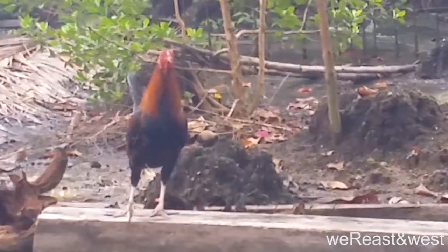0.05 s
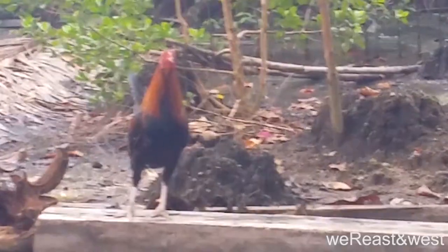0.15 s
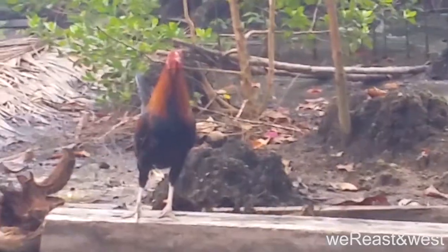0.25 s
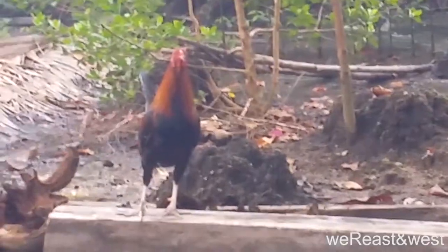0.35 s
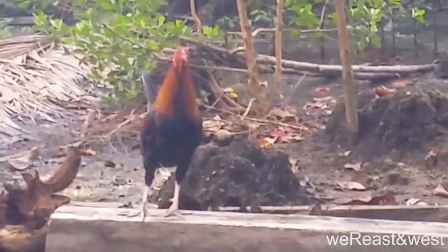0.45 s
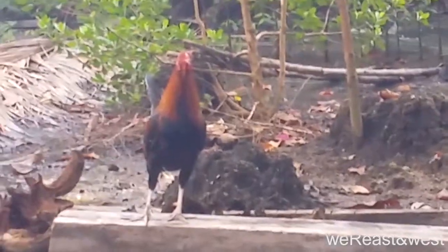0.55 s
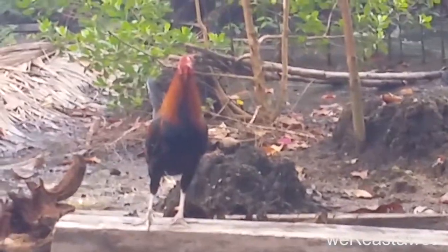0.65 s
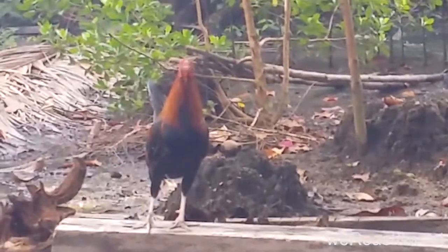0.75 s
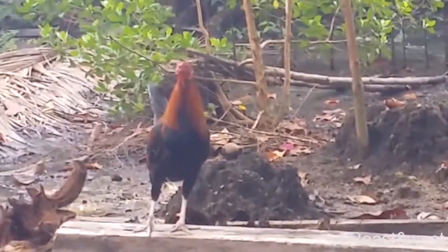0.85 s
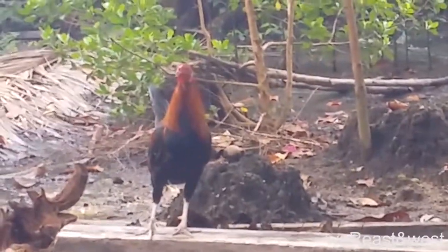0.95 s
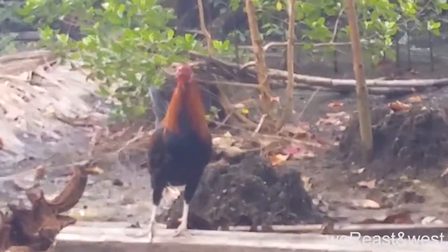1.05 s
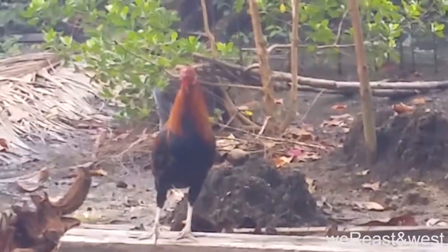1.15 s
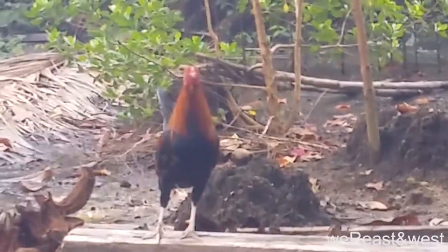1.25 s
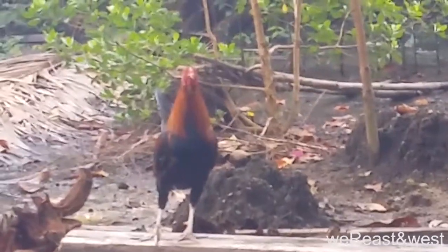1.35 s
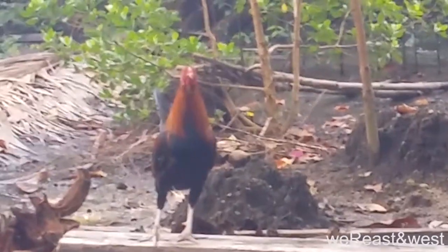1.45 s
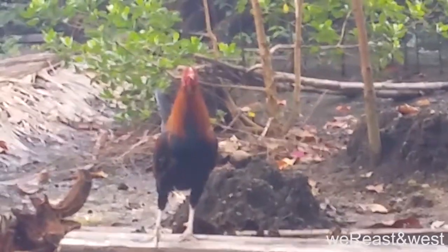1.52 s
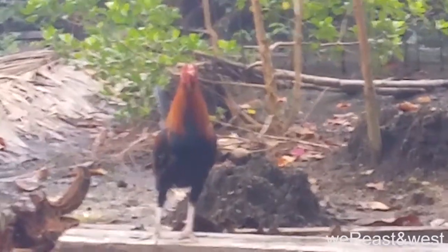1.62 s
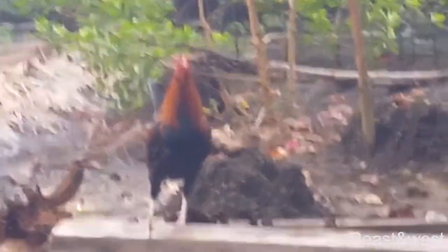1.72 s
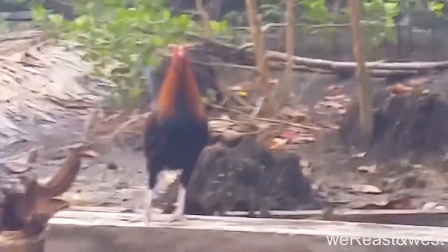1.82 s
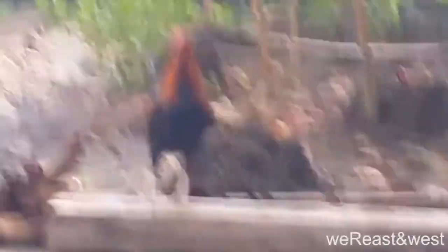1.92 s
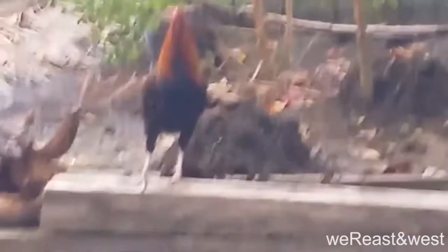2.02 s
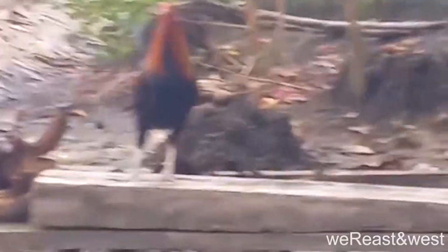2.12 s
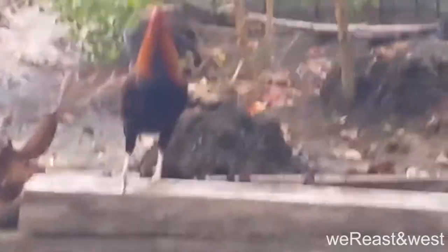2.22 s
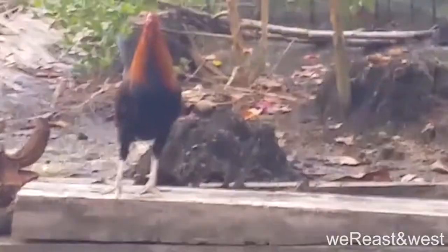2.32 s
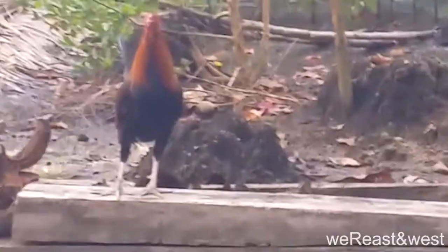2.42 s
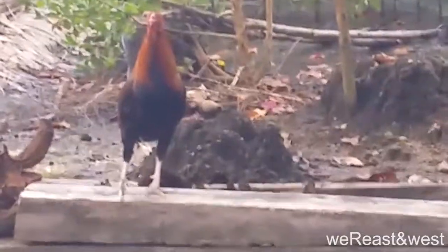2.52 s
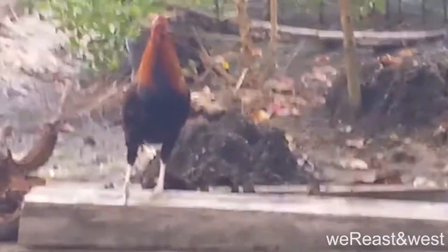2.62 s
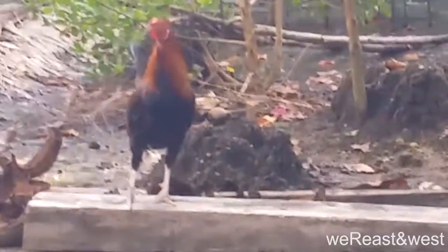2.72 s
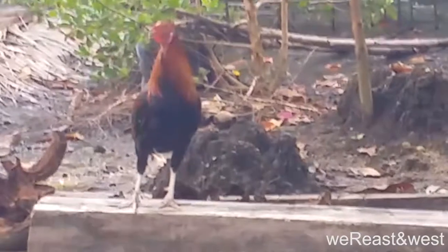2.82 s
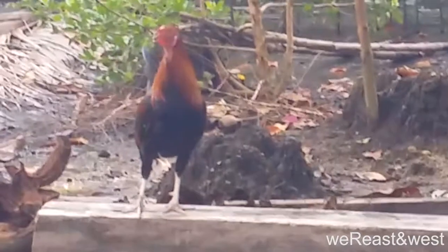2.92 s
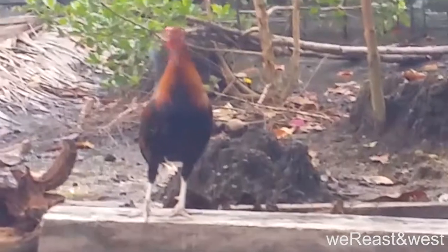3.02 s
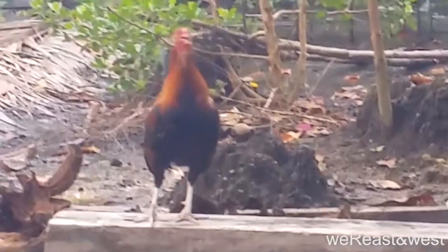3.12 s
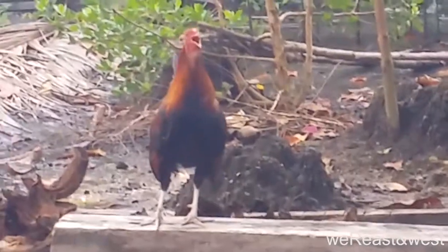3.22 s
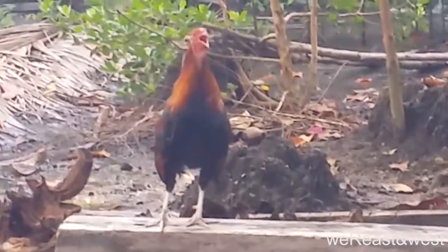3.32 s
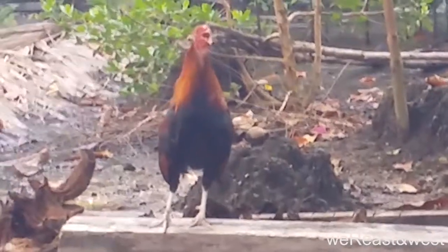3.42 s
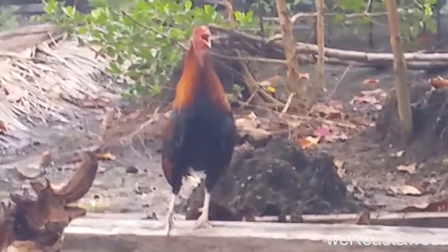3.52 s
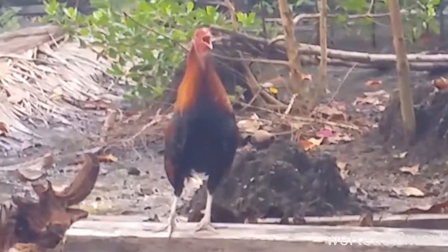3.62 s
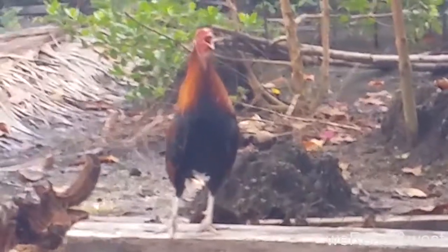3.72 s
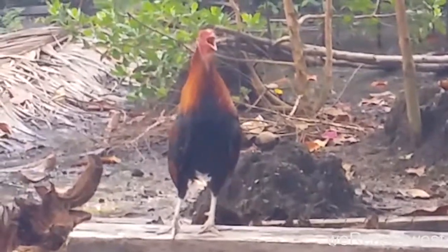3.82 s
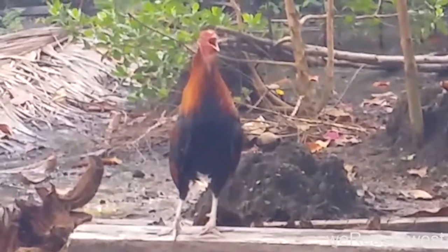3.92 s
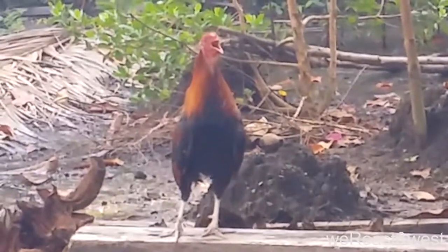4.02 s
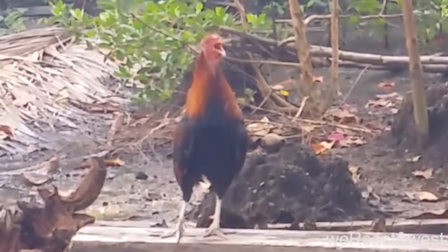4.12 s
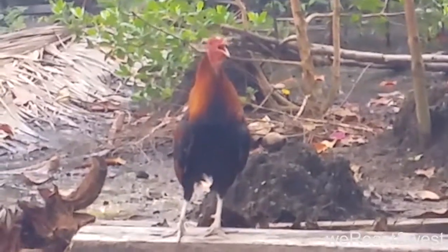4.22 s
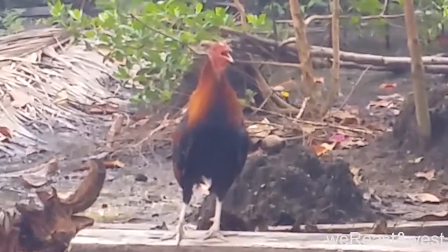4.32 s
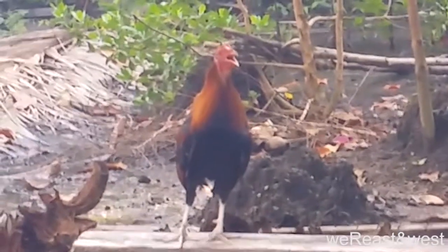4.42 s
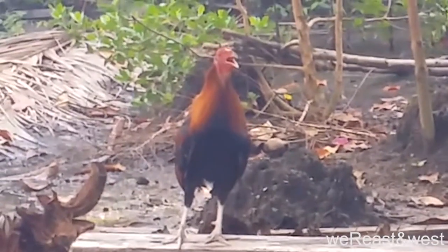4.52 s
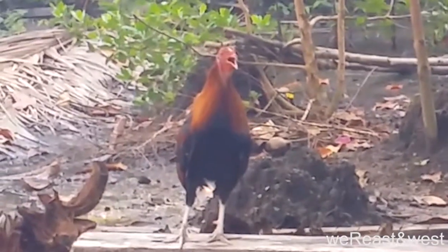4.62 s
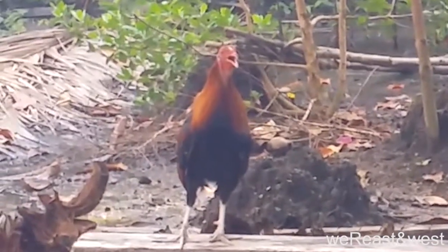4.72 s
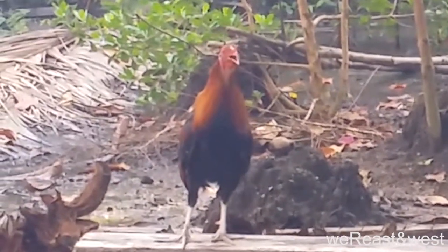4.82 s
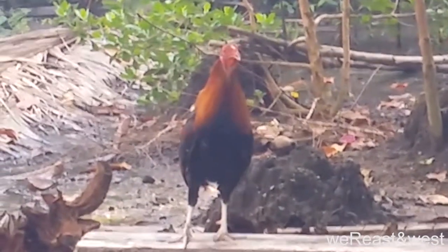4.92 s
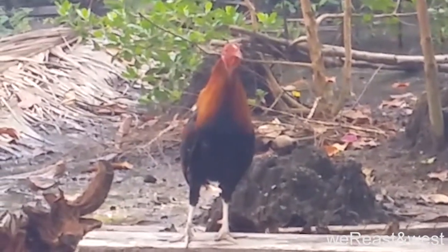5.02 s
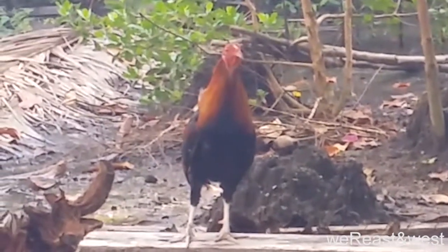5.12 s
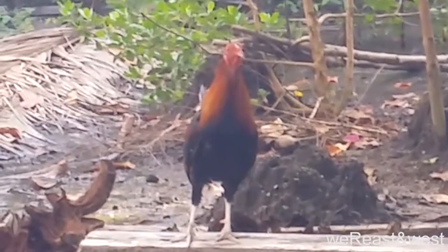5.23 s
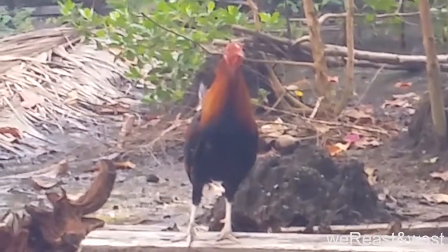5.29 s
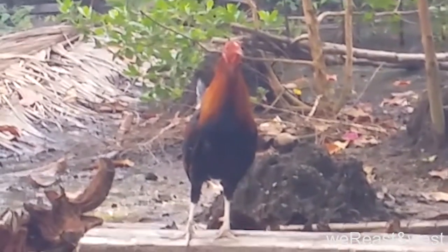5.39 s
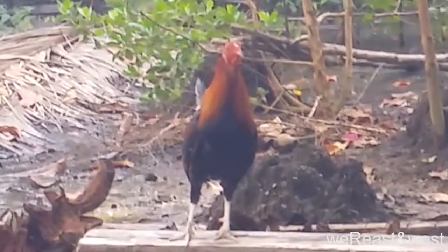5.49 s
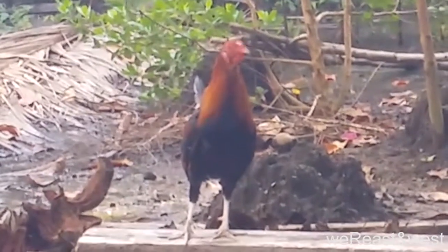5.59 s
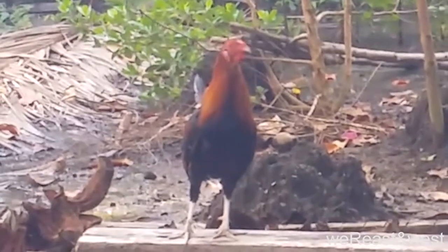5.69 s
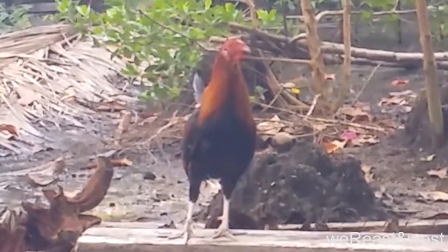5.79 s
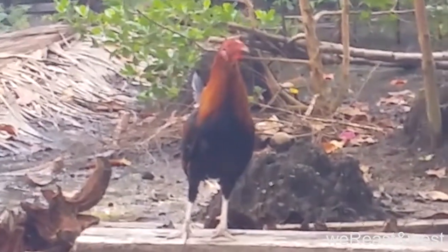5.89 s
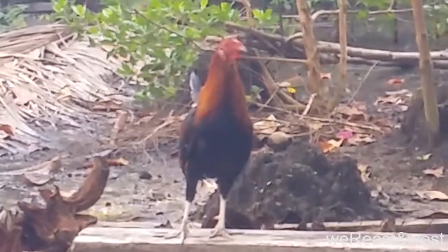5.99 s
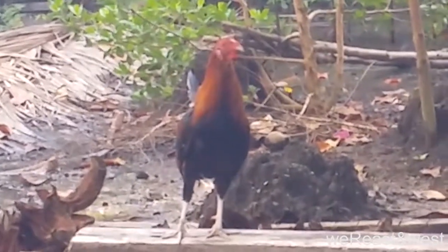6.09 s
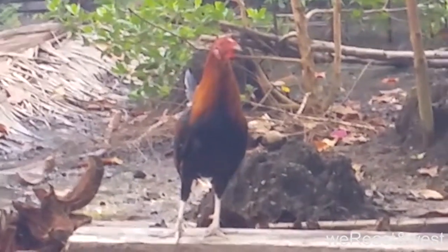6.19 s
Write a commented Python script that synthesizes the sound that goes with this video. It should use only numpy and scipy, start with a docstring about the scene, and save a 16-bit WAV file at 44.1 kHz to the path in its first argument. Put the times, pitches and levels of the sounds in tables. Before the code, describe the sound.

Outdoors in a yard, a distant one-cylinder engine putters over dull traffic rumble and soft hiss. The tail of a far rooster's crow fades at the very start, and small birds chirp thinly. The engine swells, then a rooster close to the microphone crows once: five loud, hoarse notes that overload and briefly push the engine down. Afterwards the engine and rumble continue.

```python
"""A rooster crows once, close by: five notes of drifting overtones that break into rasp and clip at full scale.
A one-cylinder engine putters past in the distance, each firing ringing its exhaust; gain control ducks it
under each note. Behind it, filtered noise gives traffic rumble and an airy hiss. Small birds chirp as gliding
sines in the trees, and at first a second rooster, one gliding overtone, ends its crow far away."""
import sys
import numpy as np
from scipy import signal
from scipy.fft import rfft, irfft, next_fast_len
from scipy.io import wavfile

SR = 44100
rng = np.random.default_rng(int(sys.argv[2]) if len(sys.argv) > 2 else 0)


def generate_wav(signal):
    """Clip the signal to [-1, 1] and save it as 16-bit WAV at the path in sys.argv[1]."""
    frames = np.transpose(np.atleast_2d(signal))
    scaled = np.clip(frames, -1, 1) * 32767
    pcm = np.round(scaled).astype(np.int16)
    wavfile.write(sys.argv[1], SR, pcm)


N = 275669
TIME = np.arange(N) / SR

# hiss spectrum: (frequency [Hz], relative level [dB])
AIR_SPECTRUM = [(300, -23.5), (500, -7), (640, -11.5), (820, -3), (1000, -8.5), (1250, -11), (1700, -11),
                (2480, -10), (3200, -16.5), (4000, -17.5), (8500, -20.5), (10500, -31), (14600, -34),
                (15500, -41)]
# hiss level before the common background step: (time [s], level [dB])
AIR_LEVEL_DB = [(0, -46), (3.1, -41), (5.3, -38), (6.25, -39)]
# traffic rumble spectrum: (frequency [Hz], relative level [dB])
RUMBLE_SPECTRUM = [(20, -48), (45, -27), (65, -6.5), (88, -4.5), (120, 1.5), (200, -6), (300, -12.5),
                   (500, -21), (900, -43), (2000, -83)]
# rumble level before the common background step: (time [s], level [dB])
RUMBLE_LEVEL_DB = [(0, -30.5), (2.4, -32), (3, -29.5), (3.5, -31.5), (4.5, -27), (5, -30.5), (5.5, -25.5),
                   (6.25, -27.5)]
# left-right likeness of wide noise: (frequency [Hz], correlation [-1..1])
LIKENESS = [(60, 1), (150, 0.89), (380, 0.72), (950, 0.093), (2380, 0.0048), (5980, -0.13), (15000, 0.25)]
# decay of the yard's scatter: (frequency [Hz], t60 [s])
YARD_T60_S = [(200, 0.87), (900, 0.37), (2000, 0.68), (7000, 0.7), (14000, 0.033)]

# small birds' glides: (start [s], length [s], start pitch [Hz], end pitch [Hz], relative level [dB])
CHIRPS = [(0.23, 0.056, 5030, 6740, -53.5), (0.471, .04, 5300, 4600, -53), (0.546, 0.042, 3260, 2970, -49),
          (0.853, 0.088, 4000, 5220, -59), (0.934, 0.046, 5330, 7000, -52.5),
          (1.452, 0.028, 4130, 3200, -49), (2.352, .06, 3730, 5380, -42), (2.405, 0.049, 4900, 7200, -36.5),
          (2.439, 0.052, 7200, 6700, -46), (2.73, 0.031, 4430, 3200, -44), (5.221, 0.029, 4580, 3820, -42)]
# far rooster's strongest overtone: (time [s], frequency [Hz], relative level [dB])
FAR_CROW = [(-.02, 2058, -29), (0.051, 1997, -64), (.15, 1965, -64), (.25, 1945, -50.5), (.35, 1897, -43),
            (.43, 1870, -66), (.5, 1800, -46)]

# engine speed: (time [s], firing rate [1/s])
FIRING_RATE_HZ = [(0, 33.7), (1.3, 34.1), (3.15, 34.45), (3.7, 32.7), (4.5, 32), (5.95, 32.35), (6.25, 30)]
# engine level before the front/rear trims and the background step: (time [s], level [dB])
ENGINE_LEVEL_DB = [(0, -30.5), (1.7, -22), (2.05, -23), (2.3, -17.5), (3.4, -17.5), (4.55, -25), (5.1, -23),
                   (5.5, -22.5), (6.25, -25)]
# exhaust spectrum before and after it passes: (frequency [Hz], relative level [dB])
EXHAUST_COMING = [(30, -62.5), (68, -39.5), (103, -14.5), (137, 1), (171, -3.5), (206, 0), (240, -20),
                  (275, -16.5), (308, -15.5), (345, -22), (410, -23.5), (480, -30.5), (600, -32.5),
                  (1500, -67)]
EXHAUST_GOING = [(30, -38), (64, -46.5), (97, -1.5), (129, 3), (161, 4), (192, -7), (225, -7.5),
                 (260, -17.5), (290, -13.5), (355, -22), (450, -22), (700, -57), (1500, -92.5)]

# crow notes: (start [s], end [s], release [s], level [dB], level slope [dB/s], opening accent [dB],
#              roughness [0-1], period doubling [0-1], slope of the 1.5x line [dB/s], rasp re level [dB])
NOTES = [(3.188, 3.333, 0.043, 8.5, -14, -1, 0.05, 0.41, 0, -22.5),
         (3.465, 3.785, 0.01, 0.5, -3.5, 0, .08, 0, 0, -22.5),
         (3.765, 4.097, 0.021, 0, 2.5, 6.5, 0.32, 0.81, 2, -12),
         (4.228, 4.549, .008, -2, -23, 9.5, 0.1, 0.97, 33, -24),
         (4.545, 4.753, 0.031, -6.5, 15, 0, .22, 0.96, -25, -12)]
# overtones of each note in turn: (multiple of the pitch [-], relative level [dB])
OPENING_OVERTONES = [(1, -19), (1.5, -48), (2, 6), (2.5, -7.5), (3, -70), (3.5, -31), (4, -35), (4.5, -50),
                     (5, -31), (5.5, -50), (6, -41), (6.5, -42), (7, -35), (7.5, -16), (8, -22), (8.5, -38),
                     (9, -31)]
RISING_OVERTONES = [(1, -10), (2, 7.5), (3, -18.5), (4, -12.5), (5, -22), (6, -20.5), (7, -25.5), (8, -24),
                    (9, -28), (10, -19.5), (11, -44), (12, -30.5), (13, -34), (14, -50), (15, -36)]
STRAINED_OVERTONES = [(1, -19), (1.5, -40), (2, 4.5), (2.5, -10), (3, -32), (3.5, -15.5), (4, -26.5),
                      (4.5, -30), (5, -31.5), (5.5, -28), (6, -28), (6.5, -45), (7, -46), (7.5, -48),
                      (8, -28.5), (8.5, -45), (9, -38)]
HELD_OVERTONES = [(1, -27.5), (1.5, -9.5), (2, 2), (2.5, -10.5), (3, -28), (3.5, -32), (4, -32.5),
                  (4.5, -29), (5, -30.5), (5.5, -38), (6, -43), (6.5, -27), (7, -28), (7.5, -20), (8, -31),
                  (8.5, -29), (9, -35)]
FALLING_OVERTONES = [(1, -12.5), (1.5, -6.5), (2, 5), (2.5, -10.5), (3, -45), (3.5, -36), (4, -52.5),
                     (4.5, -43), (5, -28), (5.5, -30), (6, -58), (6.5, -35), (7, -29), (7.5, -20.5),
                     (8, -14.5), (8.5, -27), (9, -20), (9.5, -44), (10, -25)]
# second harmonic, an octave above the pitch, one list for each of the first four notes: (time [s], frequency [Hz])
SECOND_HARMONIC_HZ = [
    [(3.197, 1865), (3.237, 1869), (3.305, 1828), (3.32, 1757)],
    [(3.472, 1943), (3.476, 1960), (3.492, 2129), (3.534, 2124), (3.58, 1916), (3.618, 1909), (3.76, 1949)],
    [(3.775, 2036), (3.793, 1954), (3.801, 2047), (3.941, 2078), (4.021, 2031), (4.035, 1936),
     (4.075, 1914)],
    [(4.232, 1856), (4.274, 2025), (4.338, 1944), (4.35, 2009), (4.42, 2009), (4.488, 1971), (4.545, 1985)],
]
# second harmonic of the last note, sinking as the voice gives out: (time [s], frequency [Hz])
LAST_SECOND_HARMONIC_HZ = [(4.56, 1809), (4.714, 1746), (4.735, 1697)]
# breaks into rasp, mostly at note edges: (time [s], rise [s], fall [s], rasp [dB], pitch drop [Hz])
BREAKS = [(3.176, .009, .011, -13.5, 200), (3.316, 0.015, 0.041, -6, 14), (3.351, 0.016, 0.054, -15.5, -15),
          (3.462, 0.011, 0.0081, -12.5, 109), (3.625, 0.022, 0.032, -13.5, -1),
          (3.762, .012, 0.013, -22, -0.5), (4.089, 0.011, 0.028, -5, 19.5), (4.17, 0.05, 0.0585, -14, 10.5),
          (4.221, 0.01603, 0.01083, -8, 111), (4.75, 0.011, 0.017, -12.5, 69)]
# throat resonances colouring the rasp: (frequency [Hz], width before narrowing [Hz], level [dB])
THROAT = [(817, 300, 3), (1303, 330, 2), (1912, 380, 4), (2458, 480, 3), (3490, 650, -6.5),
          (7100, 3200, -20), (11400, 8600, -24)]
# stereo lean of the beak's sound: (frequency [Hz], left minus right [dB])
BEAM_DB = [(900, 2), (1400, 2.5), (1950, 7), (2500, -6.5), (3500, -6), (5000, 7.5), (7000, 15.5),
           (8300, -4.5), (12000, 4)]

# engine, rumble and hiss step up together, later down again
STEP_UP_S, STEP_DOWN_S, STEP_DB = 1.73, 5.55, 5.5
# the engine passes; its sound turns from front to rear over TURN_S
PASS_S, TURN_S = 3.26, 0.1
# approaching engine: upper overtones gain BRIGHTEN dB per dB of level above PLAIN_DB
BRIGHTEN_DB_PER_DB, BRIGHTEN_FROM_HZ, PLAIN_DB = 0.44, 277, -24.5
# a note swells, overshoots briefly and settles
ATTACK_S, ACCENT_AT_S, ACCENT_S = 0.0084, 0.021, 0.019
# the folds need a moment before their cycles start to alternate
DOUBLING_FROM_S, DOUBLING_RISE_S = 0.032, 0.018
BREAK_ROUGHNESS = 0.3
# the throat's lowest resonance lifts a fundamental that slides through it
LOW_RING_HZ, LOW_WIDTH_HZ, LOW_RING_DB = 790, 45.5, -7.5
# the higher the pitch, the more the second harmonic leans right
CENTRE_HZ, SWING_DB_PER_HZ = 868, -0.0688
EDGE_HZ = 15700


def amp(db):
    """Decibels to gain."""
    return 10 ** (np.asarray(db) / 20)


def evened(x):
    """Scales to rms 1."""
    return x / np.sqrt(np.mean(x ** 2) + 1e-20)


def read(points, hz):
    """Reads a spectrum on a log-frequency axis."""
    f, value = np.transpose(points)
    return np.interp(np.log(hz + 1), np.log(f + 1), value)


def curves(rows):
    """Each column of a table at every sample; the first column is time."""
    s, *columns = np.transpose(rows)
    return [np.interp(TIME, s, column) for column in columns]


def gate(start_s, end_s, fade_s):
    """One between two times, with linear fades inside."""
    return np.clip(np.minimum(TIME - start_s, end_s - TIME) / fade_s, 0, 1)


def shaped(x, gain):
    """Filters by a gain given as a function of frequency."""
    size = next_fast_len(N + 4096)
    spectrum = rfft(x, size) * gain(np.fft.rfftfreq(size, 1 / SR))
    return irfft(spectrum, size)[..., :N]


def wander(hz):
    """Random drift of rms 1, mostly slower than hz."""
    return evened(shaped(rng.standard_normal(N), lambda f: 1 / (1 + (f / hz) ** 4)))


def glide(hz):
    """Sine of varying frequency."""
    return np.sin(2 * np.pi * np.cumsum(hz) / SR)


def ports(x, lead_ms):
    """Time difference between the sides; the left leads if positive."""
    sides = np.array([[1], [-1]])
    return shaped(x, lambda f: np.exp(1j * np.pi * f * lead_ms / 1000 * sides))


def ringing(colour, size=8192):
    """Causal (minimum-phase) click response of a given spectrum."""
    log_gain = np.log(amp(read(colour, abs(np.fft.fftfreq(size, 1 / SR)))))
    response = np.fft.ifft(np.exp(signal.hilbert(log_gain).conj())).real
    return response[:size // 2]


def yard(x):
    """Late scatter from fences, trunks and leaves: sparse random taps, each band dying at its own speed."""
    taps = rng.standard_normal((2, SR)) * (rng.random((2, SR)) < 0.06)
    taps = taps * (TIME[:SR] > 0.012)
    hz, t, bands = signal.stft(taps, SR, nperseg=256)
    decay = amp(-60 * t / read(YARD_T60_S, hz)[:, None])
    tail = signal.istft(bands * decay, SR)[1]
    tail = tail / np.linalg.norm(tail[0])
    return signal.fftconvolve(x[None], tail, axes=1)[:, :N]


def nearby(x, count=14):
    """Early reflections from ground and stems, different on each side: gliding overtones fade in and out."""
    taps = np.zeros((2, SR // 30))
    places = rng.integers(60, SR // 30, (2, count))
    signs = rng.choice([-1, 1], (2, count))
    np.put_along_axis(taps, places, signs, 1)
    return signal.oaconvolve(x[None], taps / np.sqrt(count), axes=1)[:, :N]


def wide_noise(colour):
    """Noise from all around, alike on both sides mainly in the bass."""
    left, other = rng.standard_normal((2, N))
    same = lambda f: np.clip(read(LIKENESS, f), -1, 1)
    right = shaped(left, same) + shaped(other, lambda f: np.sqrt(1 - same(f) ** 2))
    return evened(shaped(np.array([left, right]), lambda f: amp(read(colour, f))))


def air(waver_db=0.5):
    """Soft hiss of far traffic and leaves: wide noise with a slight waver."""
    level_db, = curves(AIR_LEVEL_DB)
    gain = amp(level_db + waver_db * wander(8.1))
    return gain * wide_noise(AIR_SPECTRUM) * amp([[0.4], [-0.4]])


def rumble():
    """Dull roll of traffic on the far road: low wide noise."""
    level_db, = curves(RUMBLE_LEVEL_DB)
    return amp(level_db) * ports(wide_noise(RUMBLE_SPECTRUM), lead_ms=-0.048) * amp([[0.5], [-0.5]])


def small_birds(warble=0.05):
    """Quick glides of a sine with a fast random warble."""
    song = np.zeros(N)
    wobble = 1 + warble * wander(249)
    for start_s, length_s, start_hz, end_hz, db in CHIRPS:
        end_s = start_s + length_s
        hz = np.interp(TIME, [start_s, end_s], [start_hz, end_hz]) * wobble
        song += amp(db) * gate(start_s, end_s, 0.0016) * glide(hz)
    return song


def far_rooster(unsteadiness=0.0127):
    """The end of a distant crow, reduced to its strongest overtone."""
    hz, db = curves(FAR_CROW)
    sounding = gate(FAR_CROW[0][0], FAR_CROW[-1][0], 0.02)
    return amp(db) * sounding * glide(hz * (1 + unsteadiness * wander(100)))


def far_birds():
    """Small birds and far rooster with their scatter in the trees."""
    song, crow = small_birds(), far_rooster()
    return 0.94 * song + crow + 1.22 * yard(song + 0.78 * crow)


def engine_firings(behind, uneven_coming=0.22, uneven_going=0.55, smear_s=0.012):
    """One impulse per firing, uneven in timing and strength, more so once past."""
    rate_hz, = curves(FIRING_RATE_HZ)
    drift = (0.002 + 0.016 * behind) * wander(12)
    count = np.floor(np.cumsum(rate_hz * (1 + drift)) / SR)
    uneven = np.interp(behind, [0, 1], [uneven_coming, uneven_going])
    firings = np.diff(count, prepend=0) * (1 + uneven * rng.standard_normal(N))
    # upper overtones come by longer paths, so a thud has no sharp click
    return shaped(firings, lambda f: np.exp(-2j * np.pi * smear_s * np.maximum(f - 200, 0) ** 2 / 200))


def engine(scatter_coming=0.22, scatter_going=1.0, coming_db=-4.0, going_db=1.63):
    """Each firing rings the exhaust; after the pass it runs less evenly and more arrives by reflection."""
    behind = np.clip(0.5 + (TIME - PASS_S) / TURN_S, 0, 1)
    firings = engine_firings(behind)
    coming, going = (evened(signal.oaconvolve(firings, ringing(colour))[:N])
                     for colour in (EXHAUST_COMING, EXHAUST_GOING))
    front = amp(coming_db) * evened(ports(coming, lead_ms=-0.19) + scatter_coming * yard(coming)[0])
    back = amp(going_db) * evened(ports(going, lead_ms=-0.2) + scatter_going * yard(going)[0])
    level_db, = curves(ENGINE_LEVEL_DB)
    upper = shaped(front, lambda f: 1 - 1 / (1 + (f / BRIGHTEN_FROM_HZ) ** 8))
    front = front + upper * (amp(BRIGHTEN_DB_PER_DB * (level_db - PLAIN_DB)) - 1)
    turned = np.sqrt(1 - behind) * front + np.sqrt(behind) * back
    return amp(level_db) * turned * amp([[0.5], [-0.5]])


def note_swell(start_s, end_s, release_s, level_db, slope_db_per_s, accent_db):
    """Attack, a brief accent, a hold that sags or grows, release."""
    t = np.clip(TIME - start_s, 0, end_s - start_s)
    edges = np.clip(t / ATTACK_S, 0, 1) * np.clip((end_s - TIME) / release_s, 0, 1)
    accent = accent_db * np.exp(-((t - ACCENT_AT_S) / ACCENT_S) ** 2)
    return edges * amp(level_db + slope_db_per_s * t + accent)


def voice_controls():
    """Pitch, roughness, rasp gain and presence of the fundamental, from the notes and breaks."""
    points = [point for note in [*SECOND_HARMONIC_HZ, LAST_SECOND_HARMONIC_HZ] for point in note]
    pitch_hz = curves(points)[0] / 2
    rough, rasp_power, sounding = np.zeros((3, N))
    for start_s, end_s, _, level_db, _, _, roughness, _, _, rasp_db in NOTES:
        held = gate(start_s, end_s, ATTACK_S)
        rough += roughness * held
        rasp_power += (amp(level_db + rasp_db) * held) ** 2
        sounding += held
    for s, rise_s, fall_s, rasp_db, drop_hz in BREAKS:
        burst = np.exp(-((TIME - s) / np.where(TIME < s, rise_s, fall_s)) ** 2)
        pitch_hz -= drop_hz * burst
        rough += BREAK_ROUGHNESS * burst
        rasp_power += (amp(rasp_db) * burst) ** 2
        sounding += burst
    return pitch_hz, np.clip(rough, 0, 1), np.sqrt(rasp_power), np.minimum(sounding, 1)


def crow_tone(turns, pitch_hz, rough, sounding, shimmer=0.68, fray=0.69, fizz_db=-46, waver_db=3):
    """The syrinx's overtones; when strong and weak cycles alternate, lines appear halfway between them."""
    flutter = lambda: np.exp(shimmer * rough * wander(156) - (shimmer * rough) ** 2)
    lift = amp(LOW_RING_DB) / (1 + ((pitch_hz - LOW_RING_HZ) / LOW_WIDTH_HZ) ** 2) ** 2
    low = lift * sounding * flutter() * np.cos(2 * np.pi * turns)
    out = np.array([low, low])
    shake, slip = flutter(), wander(174)
    waver = amp(waver_db * wander(13.3))
    note_overtones = (OPENING_OVERTONES, RISING_OVERTONES, STRAINED_OVERTONES, HELD_OVERTONES, FALLING_OVERTONES)
    for (*envelope, _, doubled, growth, _), overtones in zip(NOTES, note_overtones):
        swell = note_swell(*envelope) * shake
        on = np.flatnonzero(swell)
        top_db = max(db for _, db in overtones)
        since_s = TIME[on] - envelope[0]
        doubling = doubled * np.clip((since_s - DOUBLING_FROM_S) / DOUBLING_RISE_S, 0, 1)
        side_db = SWING_DB_PER_HZ * (pitch_hz[on] - CENTRE_HZ)
        # keyed by half-multiple: 3 grows or fades, 4 leans to one side
        own_gain = {3: amp(growth * (TIME[on] - TIME[on].mean())),
                    4: amp(np.array([side_db, -side_db]) / 2)}
        # above the listed overtones an even fizz of lines goes on
        fizz = [(k, top_db + fizz_db) for k in np.arange(overtones[-1][0] + 0.5, 15, 0.5)]
        for multiple, db in list(overtones) + fizz:
            halves = round(2 * multiple)
            # in a hoarse voice higher overtones slip out of step and fray into noise
            loose = fray * rough[on] * abs(multiple - 2) * slip[(on + rng.integers(N)) % N]
            phase = 2 * np.pi * rng.random() * (halves > 2)
            line = swell[on] * amp(db - top_db) * np.cos(np.pi * halves * turns[on] + loose + phase)
            if multiple > 2:  # each upper overtone comes and goes on its own
                line = line * waver[(on + rng.integers(N)) % N]
            if halves % 2:
                line = line * doubling
            out[:, on] += line * own_gain.get(halves, 1)
    return np.sqrt(2) * out


def crow_rasp(turns, lumpy=0.39, croak=0.69, stumble=0.36, narrowing=0.61):
    """Chaotic puffs of air, and a stumbling croak on every second cycle, ring the throat."""
    puffs = evened(rng.standard_normal(N) * (0.1 + np.exp(-(turns % 1) / 1.1)))
    beat = np.pi * turns + stumble * wander(127)
    pulses = evened(sum(np.cos(k * beat) for k in range(2, 9)))
    throat = lambda f: sum(amp(db) / (1 + ((f - hz) / (narrowing * width_hz)) ** 2) ** 2
                           for hz, width_hz, db in THROAT)
    return evened(shaped((puffs + croak * pulses) * np.exp(lumpy * wander(56)), throat))


def rooster_voice(jitter=0.026, tremor=0.0028, strain=0.035):
    """Tone and rasp on one unsteady pitch; part of the rasp differs between the sides."""
    pitch_hz, rough, rasp_gain, sounding = voice_controls()
    unsteady = rough * (jitter * wander(200) + strain * wander(55)) + tremor * wander(110)
    turns = np.cumsum(pitch_hz * (1 + unsteady)) / SR
    rasp = crow_rasp(turns) + 0.5 * np.array([crow_rasp(turns), crow_rasp(turns)])
    return crow_tone(turns, pitch_hz, rough, sounding) + rasp_gain * rasp


def rooster(yard_db=-18, treble_scatter_db=6, nearby_bass_db=-20, nearby_treble_db=-3):
    """The voice direct, by early reflections and by yard scatter; the foliage scatters the treble most."""
    voice = rooster_voice()
    mono = voice.mean(0)
    share_db = [(2200, nearby_bass_db), (4500, nearby_treble_db)]
    share = lambda f: np.minimum(amp(read(share_db, f)), 0.95)
    direct = ports(shaped(voice, lambda f: np.sqrt(1 - share(f) ** 2)), lead_ms=0.07)
    early = nearby(shaped(mono, share))
    scatter_db = [(2500, 0.026), (7000, treble_scatter_db)]
    scattered = shaped(mono, lambda f: amp(read(scatter_db, f)))
    beamed = shaped(direct + early, lambda f: amp(read(BEAM_DB, f) * np.array([[0.5], [-0.5]])))
    return beamed + amp(yard_db) * yard(scattered)


def gain_control(x, threshold_db=-19, squeeze=0.39, listen_s=0.024, react_s=0.0049,
                 look_ahead_s=0.0087, deaf_below_hz=600):
    """Turns everything down while mids and treble are loud, so the engine ducks under each note."""
    def lag(v, s):
        """One-pole smoothing."""
        keep = np.exp(-1 / (s * SR))
        return signal.lfilter([1 - keep], [1, -keep], v)

    heard = shaped(x, lambda f: 1 - 1 / (1 + (f / deaf_below_hz) ** 4))
    power = lag((heard ** 2).mean(0), listen_s)
    over_db = 10 * np.log10(1 + power / amp(threshold_db) ** 2)
    return x * amp(-squeeze * np.interp(TIME + look_ahead_s, TIME, lag(over_db, react_s)))


def scene():
    """The rooster in front, everything else far behind."""
    step = amp(STEP_DB * gate(STEP_UP_S, STEP_DOWN_S, 0.0041))
    background = step * (air() + rumble() + engine())
    return background + far_birds() + rooster()


def record(dry, ceiling=1.0):
    """Gain control, then clipping of what still exceeds the ceiling, then the band limit."""
    clipped = np.clip(gain_control(dry), -ceiling, ceiling)
    low_pass = signal.firwin(511, EDGE_HZ, window=("kaiser", 9), fs=SR)
    return signal.oaconvolve(clipped, low_pass[None], "same")


dry = scene()
out = record(dry)
generate_wav(out)
```